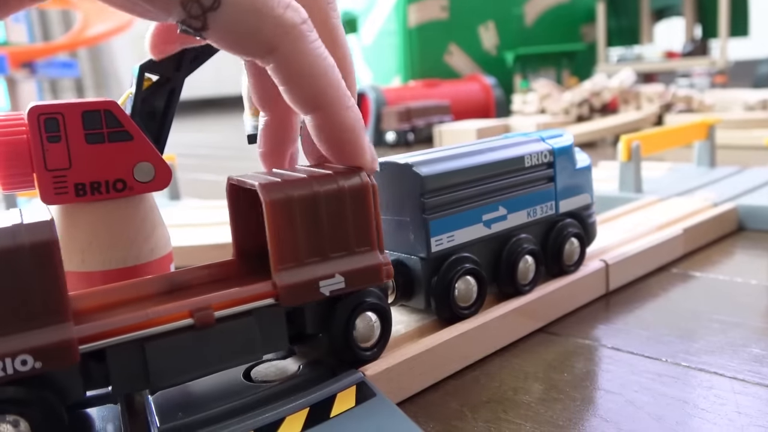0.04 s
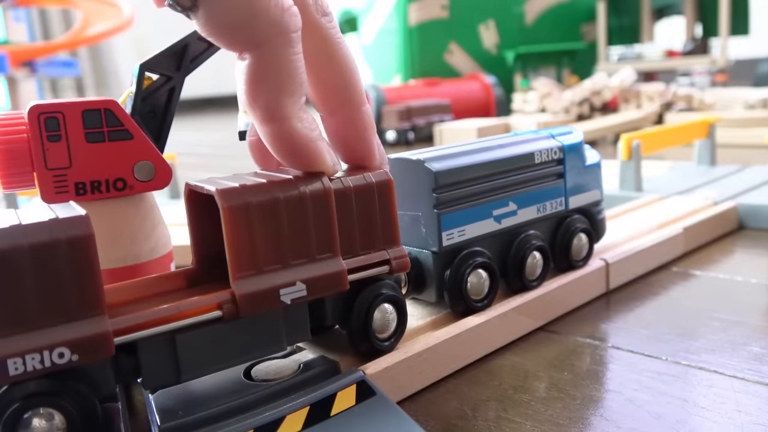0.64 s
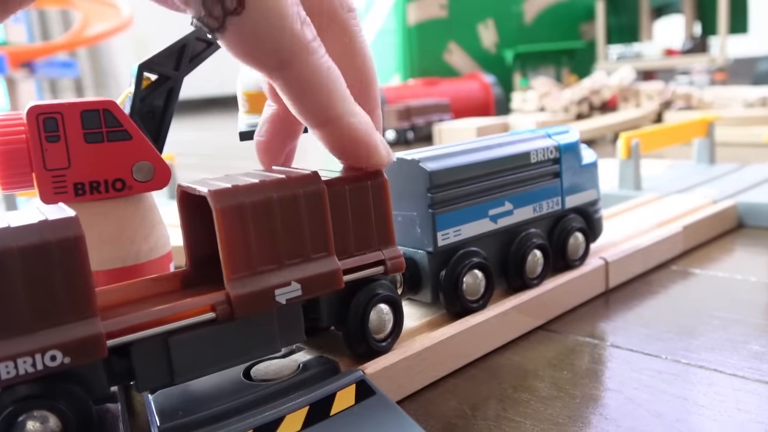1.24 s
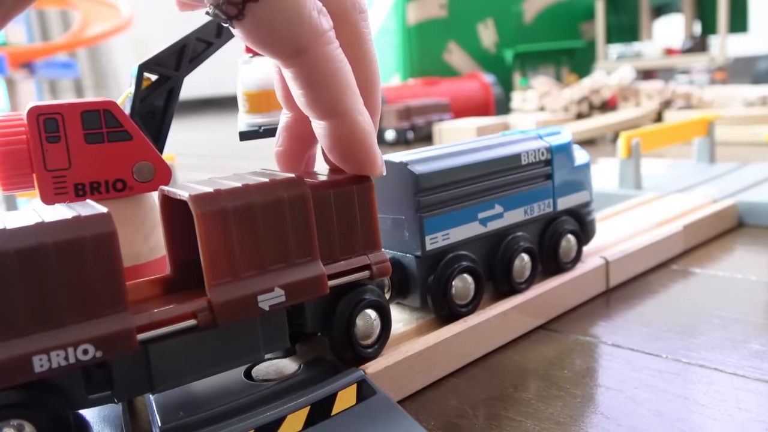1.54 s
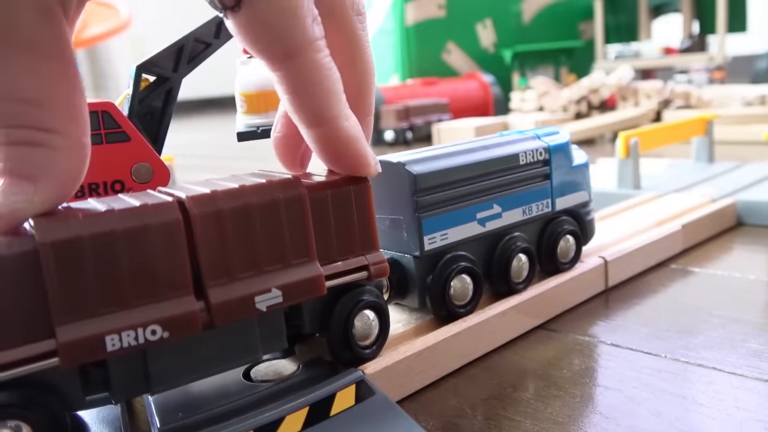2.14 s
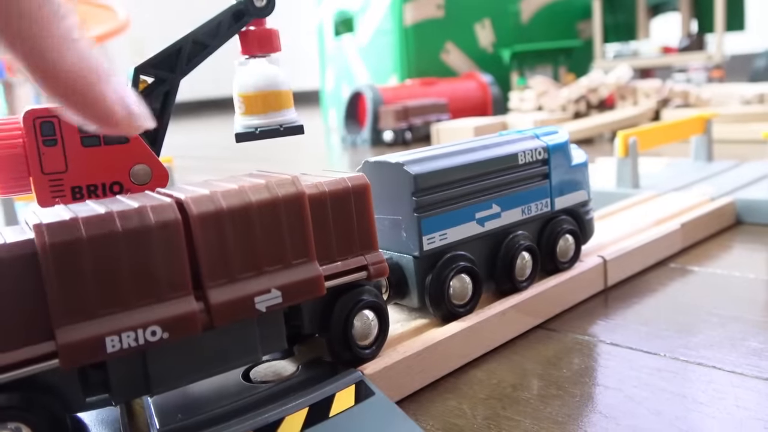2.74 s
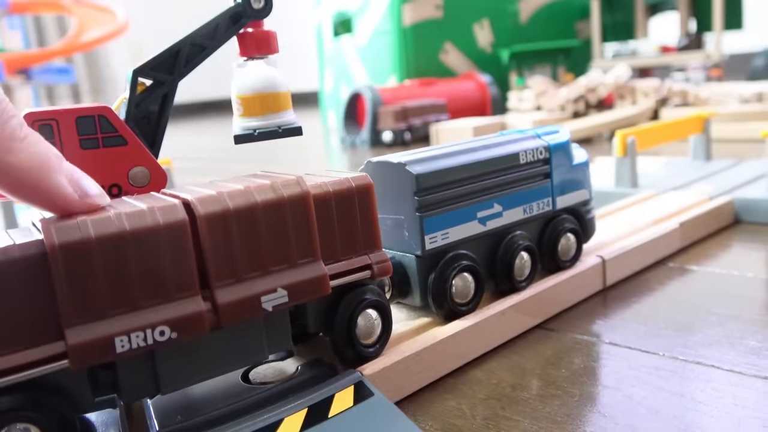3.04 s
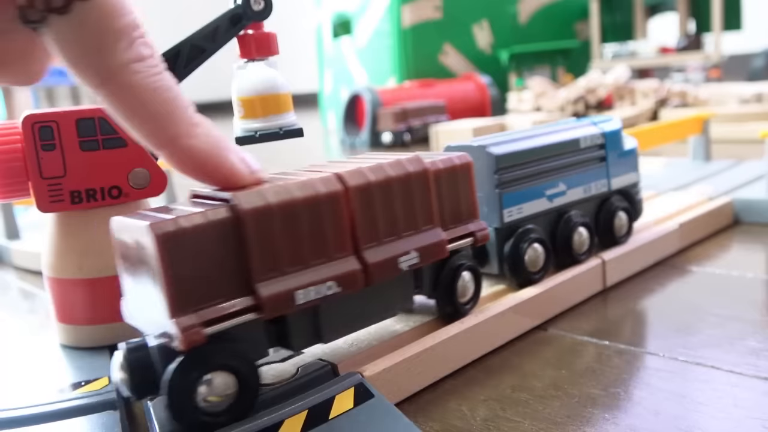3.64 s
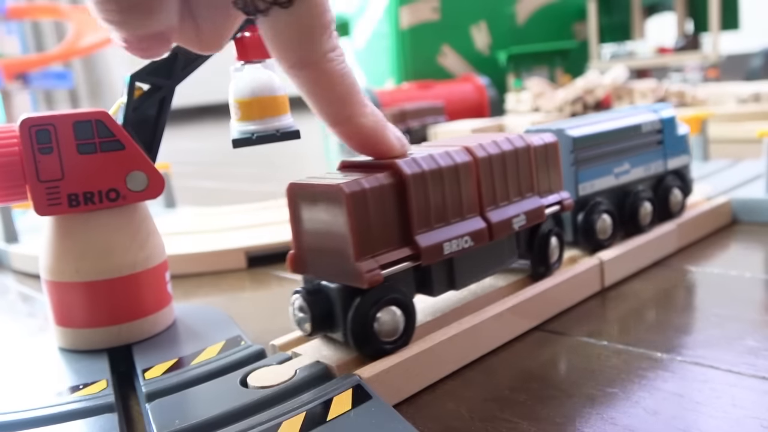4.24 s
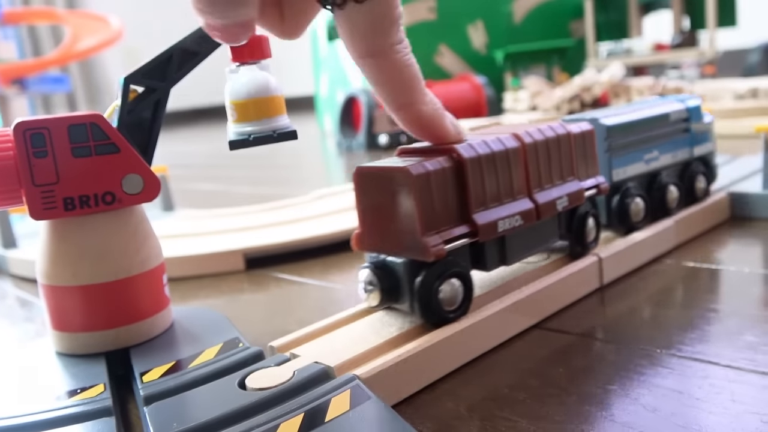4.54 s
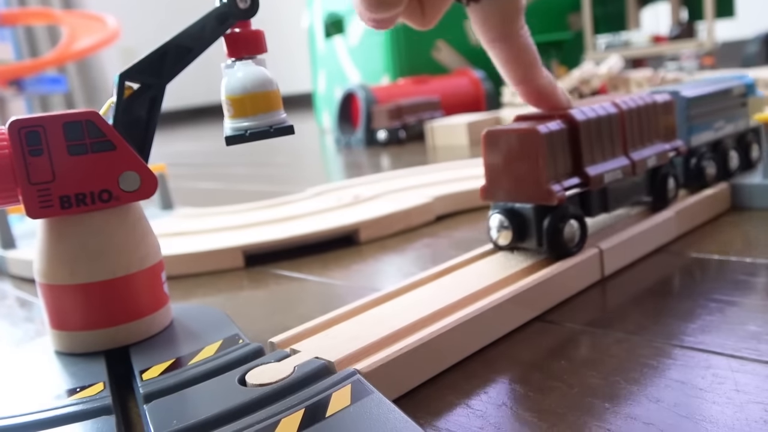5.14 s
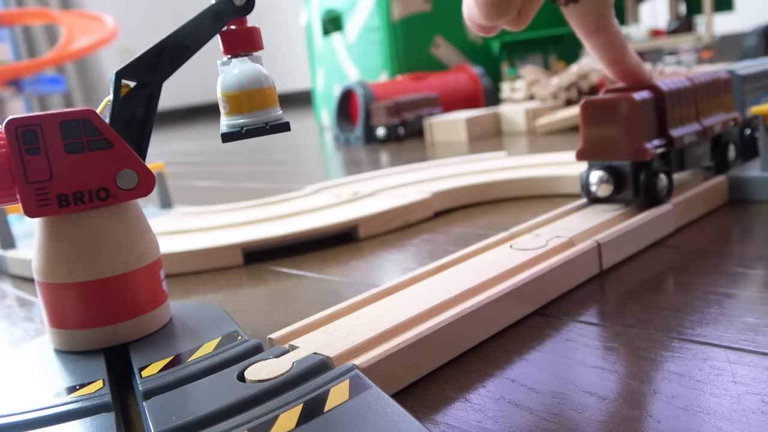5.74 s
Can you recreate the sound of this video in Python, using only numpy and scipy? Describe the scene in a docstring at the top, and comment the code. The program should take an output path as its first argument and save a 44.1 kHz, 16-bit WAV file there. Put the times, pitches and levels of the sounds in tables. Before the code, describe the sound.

Fingers slide a toy wagon's plastic cover with soft scrapes, clicks and bumps until it shuts with a sharp, briefly ringing snap. After a few more clicks and a lull, the toy train drops off a ramp with a clack and rumbles along wooden track, knocking at the joints and drifting slightly right. It is heard close up in a small, hard-floored room with a faint fan.

```python
"""Toy wagon on a wooden track

Fingers slide the plastic cover of a toy wagon along its grooves until it snaps shut and the shell rings.
Then they push the train off to the right: the wagon drops off a ramp with a clack, and its wheels
rumble over the grain and knock at the rail joints. A pair of microphones stands close by,
in a small room with a hard floor and a faint fan to the left."""
import sys
import numpy as np
from scipy import signal
from scipy.fft import rfft, irfft, next_fast_len
from scipy.io import wavfile

SR = 44100
rng = np.random.default_rng(int(sys.argv[2]) if len(sys.argv) > 2 else 0)


def dump(signal):
    """Clip the signal to [-1, 1] and save it as 16-bit WAV at the path in sys.argv[1]."""
    limited = np.clip(np.atleast_2d(signal).T, -1, 1)
    pcm = np.round(limited * 32767).astype(np.int16)
    wavfile.write(sys.argv[1], SR, pcm)


N = 264159
TIME = np.arange(N) / SR

# wheels drop off the ramp, then hit joints and dents in the rails:
# (time [s], level [dB], weight [dB], hardness [dB], edge [dB], note [Hz], ring against level [dB])
WHEEL_KNOCKS = [(3.5474, -25, 4, 8, -1, 1514, 8.5), (3.5496, -22, 4, 1.5, 5, 1156, -1),
                (3.5543, -29.5, -12, 11.5, 9, 2680, -9), (3.5638, -36.5, 16.5, 10, -1, 131, 8),
                (3.9245, -30.5, -21, 1.5, 5.5, 1390, -14), (3.956, -38.5, -1, 2, -3, 1160, 5),
                (3.98, -47.5, 12.5, -6, -10, 272, 6), (4.005, -42, 7.5, -1.5, -6, 1210, 3),
                (4.052, -42, -5, 8, -37, 2130, 6.5), (4.0856, -29, 1.5, -10, -12, 1230, -10),
                (4.552, -38.5, -2, -7, -14, 724, 0), (4.562, -41, 11, -8, -8, 269, 7),
                (4.589, -37.5, 3, -8, 13, 600, 5), (4.656, -44, 14.5, 0, -8, 264, 11),
                (4.687, -38, -6, -5, -4, 1300, -1), (4.736, -47, 17, -12, -4, 250, 0),
                (4.763, -41.5, -1, 11, 0, 1560, 15.5), (4.7642, -42, 11.5, 18.5, -14, 2170, 6),
                (4.8168, -31.5, -1.5, 5, -5, 470, 5.5), (4.8466, -36, 8, 0, -6, 1790, 3),
                (4.937, -36.5, 8, -12, -7, 264, 10), (4.98, -38.5, -4, -14, -8, 1050, 3),
                (5.056, -39, -3, 3.5, -11, 571, 0), (5.115, -37.5, -3, -6, -1, 800, -3),
                (5.2526, -37, -12, -6, -6, 984, 0), (5.296, -42, 8, -7, -4, 242, 15.5),
                (5.341, -33, 0, -4, -11, 459, 4.5), (5.4295, -37, -28, -19, -4, 1030, -10),
                (5.447, -36.5, -1, -5, -23, 1990, 0), (5.523, -41, 4, 3.5, -10, 2800, -7),
                (5.6111, -29.5, 1, 2.5, 8.5, 488, 9), (5.633, -30.5, 1.5, -2, 2, 431, 7),
                (5.6613, -37, 0, -1, -2, 996, 1), (5.668, -36, 7.5, 1, 5.5, 381, 7.5),
                (5.906, -38.5, -12, -4, -11, 1130, -5), (5.9246, -35, -14, 1, -1, 960, -4),
                (5.945, -31, -0.5, 4, 4, 890, -15), (5.956, -33, 2.5, -0.5, 7, 1080, -10),
                (5.964, -36, 6, 1, -2, 1010, -8)]
def wheel_knocks():
    """A wheel strikes the rail, leaves a note ringing and thuds through the floor."""
    out = np.zeros(N)
    for s, db, weight_db, hardness_db, edge_db, note_hz, ring_db in WHEEL_KNOCKS:
        add(out, s, blow(db, weight_db, hardness_db, note_hz, edge_db))
        add(out, s, ringing(note_hz, db + ring_db, t60_at_500_hz=0.087))
        add(out, s, floor_thud(db + weight_db - 13))
    return out


# the train rolling past the microphones: (time [s], rumble [dB], grit [dB])
ROLL = [(3.279, -65, -78), (3.42, -44.5, -60), (3.48, -33, -51), (3.62, -36, -48), (3.76, -39, -51),
        (3.94, -40.5, -48.5), (4.02, -33, -50.5), (4.2, -34, -48), (4.48, -40.5, -55), (4.53, -36.5, -49.5),
        (4.57, -32, -44), (4.68, -30.5, -44), (4.85, -33.5, -44), (5.0, -36, -47), (5.15, -41, -48.5),
        (5.3, -35, -46.5), (5.49, -41, -45.5), (5.6, -36.5, -46), (5.8, -41, -51), (5.99, -37, -45)]
# the note of the rail shifts as the wagon travels: (time [s], note [Hz])
RAIL_NOTE = [(3.5, 243), (3.8, 265), (4.0, 291), (4.25, 262), (4.45, 261.4), (4.7, 260), (4.95, 267.6),
             (5.3, 228.6), (5.6, 238.6), (5.95, 258)]
# its partials: (multiple of the note, width [Hz], level against the rumble [dB])
RAIL_PARTIALS = [(1, 62, -3.5), (1.92, 131, -12.5)]
# wheels on wood grain: (frequency [Hz], spectrum level [dB])
GRIT_SPECTRUM = [(250, -26), (480, 10.5), (720, 11.5), (880, 7), (1150, 8.5), (1400, 1.5), (1800, 0),
                 (2200, -4), (2800, -3), (3500, -11), (5300, -18), (6500, -14.5), (7400, -16),
                 (8500, -23.5), (10000, -19.5), (16000, -36)]
# wheel and axle resonances: (frequency [Hz], width [Hz], level against the grit [dB])
CHATTER_MODES = [(1003, 30, -14.5), (1205, 140, -18), (1710, 310, -11.5), (2194, 160, -19),
                 (2785, 390, -19.5)]
def rolling_wheels():
    """Wheels ride over bumps that shake the track and its rail, and chatter on the wood grain."""
    push = impacts(per_s=420, spread_db=2.5) * wander(hz=16, depth_db=2.5)
    note_hz = np.interp(TIME, *np.transpose(RAIL_NOTE))
    rail = sum(gain_of(db) * gliding_resonance(push, multiple * note_hz, width)
               for multiple, width, db in RAIL_PARTIALS)
    rumble = rail + gain_of(-3) * track(impacts(per_s=760, spread_db=2.5))
    grain = impacts(per_s=4000, spread_db=1.45) * wander(hz=42.48, depth_db=1.6)
    chatter = sum(gain_of(db) * resonate(grain, hz, width) * wander(hz=14, depth_db=5)
                  for hz, width, db in CHATTER_MODES)
    grit = gain_of(-0.5) * coloured(grain, GRIT_SPECTRUM) + chatter
    return rumble * envelope(ROLL) + grit * envelope(ROLL, column=2)


# the wooden track lying on the floor: (frequency [Hz], width [Hz], relative level [dB])
TRACK_MODES = [(85, 30.3, -40), (127, 29.6, -20.5), (159.6, 15, -15.5), (202, 9.8, 2), (256, 24, 2.5),
               (286, 26, -1), (317, 40, -23), (509, 160, 0)]
def track(push):
    """The track answers a push with its low resonances; their shares shift as the load moves along."""
    rings = sum(gain_of(db) * resonate(push, hz, width) * wander(hz=6.1, depth_db=2)
                for hz, width, db in TRACK_MODES)
    return unit_rms(band(rings, 103, 558, order=3))


# the thin shell's crowded modes: (frequency [Hz], width [Hz], relative level [dB], t60 [s])
SHELL_BANDS = [(775, 410, -7.5, 0.38), (1295, 480, -12.5, 0.76), (2495, 330, -0.5, 0.29),
               (3150, 640, 3, 0.45), (4970, 2400, -7, 0.4), (8650, 2400, -3.5, 0.25)]
# its clear notes: (frequency [Hz], relative level [dB], t60 [s])
SHELL_NOTES = [(2320, -19, .45), (2710, -15, 0.76), (2920, -16, .5), (3170, -12, .6), (3233, -12, .6),
               (3340, -15, .6), (3320, -15, .6), (3530, -16, .6), (3950, -19.5, 0.63), (4760, -22.5, .5)]
# plastic rubbing on plastic: (frequency [Hz], spectrum level [dB])
SCRAPE_SPECTRUM = [(1180, -15), (2000, -15.5), (2490, -4), (2880, -2.5), (3490, -6.5), (4530, -10),
                   (4900, -6.5), (6310, -15), (7910, -9), (13400, -24), (16000, -25)]
SNAP_S = 1.5153
def cover_snap(shell_db=-31, rush_db=-16, swell_s=0.0041, lead_s=0.0028, stop_s=0.0016):
    """The cover rushes over its catch and snaps shut; its shell buzzes and rings away."""
    after = TIME - SNAP_S
    fall_db = -60 * np.maximum(after, 0)
    clatter = impacts(per_s=2800, spread_db=-1) * wander(hz=71, depth_db=2)
    buzz = sum(gain_of(db + fall_db / t60) * resonate(resonate(clatter, hz, width), hz, width)
               for hz, width, db, t60 in SHELL_BANDS)
    notes = sum(gain_of(db + fall_db / t60) * np.sin(2 * np.pi * (hz * after + rng.random()))
                for hz, db, t60 in SHELL_NOTES)
    slip = after + lead_s  # the scrape peaks just ahead of the snap
    swell = np.exp(-np.maximum(-slip / swell_s, slip / stop_s))
    rush = coloured(rng.standard_normal(N), SCRAPE_SPECTRUM) * swell
    return gain_of(shell_db) * (buzz + notes) * (after > 0) + gain_of(rush_db) * rush


# plastic parts catching, heard close up: (time [s], level [dB], hardness [dB], note [Hz])
CLICKS = [(0.035, -41, 3.5, 3000), (0.049, -51, 8, 5000), (0.1426, -40.5, 6, 4070), (0.429, -37, 3.5, 2640),
          (0.5869, -44.5, 6, 4130), (0.7193, -49.5, -19, 2450), (0.837, -61, 3.5, 4900),
          (1.0415, -54, -5, 5000), (1.4505, -33, 7, 4830), (1.5085, -28.5, -3, 760),
          (1.5155, -20, 2.5, 2480), (1.532, -49, -4, 5000), (1.589, -37, -4, 4700),
          (1.7998, -41.5, 3.5, 2600), (1.948, -48, -9, 3670), (2.073, -41, -9.5, 905),
          (2.164, -34, -4.5, 2290), (3.02, -65, 6, 4000), (3.504, -63.5, 14, 4870),
          (3.7833, -56, 6.5, 8470), (3.863, -50.5, -1, 7560), (4.389, -43.5, -14, 2370)]
WAGON_HZ = 283.7  # the low note that clicks and blows wake in the wagon
def plastic_clicks(cover_hz=3120):
    """Plastic parts catch and click; each click leaves the cover ringing faintly."""
    shape_db = np.array([-12, -6, -3, -6, -9])  # thump, knock, clack, click, edge
    hardening = np.array([-0.51, -0.33, -0.18, 0.77, 0.97])
    out = np.zeros(N)
    for s, db, hardness_db, note_hz in CLICKS:
        add(out, s, knock(db + shape_db + hardness_db * hardening, (WAGON_HZ, note_hz)))
        add(out, s, ringing(cover_hz * rng.uniform(1, 1.03), db - 23, t60_at_500_hz=0.5))
    return out


# fingers land on the wagon:
# (time [s], level [dB], weight [dB], hardness [dB], note [Hz], ring against level [dB])
FINGER_BUMPS = [(0.048, -40, 1, -2, 1000, -8), (0.165, -40.5, -19, -18, 1400, -6),
                (0.216, -44.5, 5, -2, 1300, -6), (0.552, -33.5, 6.5, -8, 301, 3),
                (0.672, -45.5, 1.5, -9, 1100, -14), (0.85, -50, 11.5, -3, 258, -5),
                (0.9664, -43, -7, -7.5, 1074, -9), (1.0091, -45.5, 7.5, 5, 300, -1),
                (1.047, -36.5, 0.5, 4.5, 720, -6), (1.328, -43.5, 5, -7, 280, 3.5),
                (1.363, -48, -7, -1, 1200, -4), (1.3796, -48, 8.5, 3, 200, 6),
                (1.598, -35.5, 8.5, 4.5, 302, -5.5), (1.845, -41.5, 0, 4, 267, -3.5),
                (2.136, -49, -0.5, -1, 1000, -17), (3.018, -36, -2, -10, 1050, -2)]
def finger_bumps(rise_s=0.00096):
    """A soft fingertip eases into its blow and leaves the wagon ringing."""
    out = np.zeros(N)
    for s, db, weight_db, hardness_db, note_hz, ring_db in FINGER_BUMPS:
        hit = blow(db, weight_db, hardness_db, note_hz)
        add(out, s, hit * (1 - np.exp(-TIME[:len(hit)] / rise_s)))
        add(out, s, ringing(note_hz, db + ring_db, t60_at_500_hz=0.16))
    return out


def blow(db, weight_db, hardness_db, note_hz, edge_db=0):
    """A blow through the wheels into the wood: weight deepens, hardness brightens, an edge adds snap."""
    shape_db = np.array([-1.5, 0, -10, -19, -26])  # thump, knock, clack, click, edge
    hardening = np.array([0.0046, 0, 1.17, 1.27, 1.35])
    levels_db = db + shape_db + hardness_db * hardening
    levels_db[0] += weight_db
    levels_db[-2:] += edge_db * np.array([0.49, 1])
    return knock(levels_db, (WAGON_HZ, note_hz), favour_db=9.5, favour_width=0.19)


# the five registers of a contact, from thump through knock, clack and click to edge:
# (low limit [Hz], high limit [Hz], crack t60 [s], crack against modes [dB])
REGISTERS = [(140.3, 420, 0.031, -14.5), (395, 1780, 0.046, -1.5), (1840, 3600, 0.022, 5),
             (3730, 5940, 0.018, 2), (6640, 12000, 0.014, 1.5)]
# wagon and track ringing together: (frequency [Hz], relative level [dB], t60 [s])
BODY_MODES = [(123, -9, 0.05), (155, -1.5, 0.038), (201, 5, 0.031), (258, -2.5, 0.043), (322, 0.5, 0.04),
              (436.6, -5, 0.078), (476.6, -3, 0.078), (543.3, 7, 0.056), (690, -7.5, 0.067),
              (1035, -1, 0.036), (1161, 1.5, 0.033), (1434, 2.5, 0.025), (1633, -1.5, 0.0092),
              (1794, -1, 0.018), (2220, 12, 0.017), (2340, 0, 0.037), (2754, 5, 0.013), (2904, -0.5, 0.041),
              (3235, -0.5, 0.027), (4040, 14.5, 0.0064), (4700, 3.5, 0.026), (5360, -20.5, 0.0049),
              (7430, 1, 0.011), (8280, -5.5, 0.016), (10600, -12, .012)]
def knock(levels_db, notes_hz, favour_db=6, favour_width=0.12, detune=0.036):
    """One contact: a short crack and the body's modes, weighted and detuned by where it lands."""
    t = np.arange(2560) / SR
    bins = np.fft.rfftfreq(len(t), 1 / SR)
    # the force runs smoothly through the registers and favours the given notes
    centres = [np.sqrt(low * high) for low, high, *_ in REGISTERS]
    nearness = sum(np.exp(-(np.log((bins + 1) / note) / favour_width) ** 2) for note in notes_hz)
    force = gain_of(at_hz(np.transpose([centres, levels_db]), bins) + favour_db * nearness)
    hz, mode_db, t60 = np.transpose(BODY_MODES)
    landing = rng.uniform(0.71, 1, len(hz)) * rng.choice([-1, 1], len(hz))
    weights = landing * gain_of(mode_db) * np.interp(hz, bins, force)
    hz = hz * (1 + detune * rng.uniform(-1.14, 1, len(hz)))
    modes = weights[:, None] * gain_of(-60 * t / t60[:, None]) * np.sin(2 * np.pi * hz[:, None] * t)
    noise = rfft(rng.standard_normal(len(t))) * force
    out = np.zeros(len(t))
    for (low, high, crack_t60, crack_db), db in zip(REGISTERS, levels_db):
        ring = modes[(low <= hz) & (hz < high)].sum(0)
        crack = irfft(noise * ((low <= bins) & (bins < 1.35 * high)), len(t))
        crack *= gain_of(-60 * t / crack_t60)
        part = band(unit_rms(ring) + gain_of(crack_db) * unit_rms(crack), low, high)
        out += gain_of(db) * part / np.sqrt(np.mean(part[:SR // 100] ** 2))  # level of the first 10 ms
    return out


def ringing(hz, db, t60_at_500_hz):
    """The note of a struck part swells within a cycle or so and dies away, sooner if it is high."""
    t = np.arange(SR // 3) / SR
    t60 = t60_at_500_hz * np.sqrt(500 / hz)
    swell = 1 - np.exp(-t * hz)
    return gain_of(db - 60 * t / t60) * swell * np.sin(2 * np.pi * (hz * t + rng.random()))


# fingers press and drag on the wagon: (time [s], level [dB])
HANDLING = [(0.0, -42), (0.14, -40), (0.35, -48.5), (1.36, -63.5), (1.58, -57.5), (2.0, -67.5),
            (2.35, -60.5)]
def jostling(jolt_db=-30, rock_db=-20):
    """The wagon shakes on its loose axles as it is handled, jolted by the snap and rocked by bumps."""
    shake = gain_of(-3) * track(impacts(per_s=320, spread_db=3))
    ticks = coloured(impacts(per_s=180, spread_db=1), GRIT_SPECTRUM)
    axle_play = gain_of(-10) * unit_rms(band(ticks, 430, 1600))
    rocking = sum(settling(s, db + weight_db + rock_db) for s, db, weight_db, *_ in FINGER_BUMPS)
    return (shake + axle_play) * (envelope(HANDLING) + settling(SNAP_S, jolt_db)) + shake * rocking


def settling(s, db, db_per_s=112.5):
    """The wagon shakes from time s on, less and less."""
    return (TIME > s) * gain_of(db - db_per_s * abs(TIME - s))


# the cover slides and fingers brush its ribs: (start [s], length [s], rub [dB], whistle [dB])
STROKES = [(-.03, 0.18, -53, -60), (0.135, 0.15, -60.5, -60), (0.217, 0.16, -54.5, -70),
           (0.416, 0.09, -53, -62), (0.588, 0.046, -55.5, -64), (0.992, 0.066, -59.5, -74),
           (1.195, 0.14, -69.5, -63), (1.726, 0.073, -50.5, -74), (1.793, 0.23, -54.5, -81),
           (3.32, 0.35, -64, -75)]
# the whistle of the grooves: (frequency [Hz], width [Hz], relative level [dB])
GROOVE_MODES = [(2950, 250, 0), (5040, 260, -6.5), (9190, 520, 0.5)]
def cover_slides():
    """The cover rubs and whistles along its grooves, swelling and fading with each stroke."""
    friction = impacts(per_s=3500, spread_db=1.5) * wander(hz=58.4, depth_db=3.5)
    rub = coloured(friction, SCRAPE_SPECTRUM)
    whistle = unit_rms(sum(gain_of(db) * resonate(rng.standard_normal(N), hz, width)
                           for hz, width, db in GROOVE_MODES))
    out = np.zeros(N)
    for s, length, rub_db, whistle_db in STROKES:
        arch = np.sin(np.pi * np.clip((TIME - s) / length, 0, 1))
        out += (gain_of(rub_db) * rub + gain_of(whistle_db) * whistle) * arch
    return out


def rattle(count=34):
    """Loose axles and couplings tap at random while the train rolls, harder where the wheels run rough."""
    s, _, grit_db = np.transpose(ROLL)
    shape_db = np.array([0, 0, -8, -19, -28])  # thump, knock, clack, click, edge
    times = s[0] + (np.arange(count) + rng.random(count)) / count * (s[-1] - s[0])
    notes_hz = rng.choice([hz for hz, *_ in BODY_MODES], (count, 3))
    scatter_db = 3 * rng.uniform(-3.9, 1, (count, len(REGISTERS)))
    out = np.zeros(N)
    for at, notes, chance_db in zip(times, notes_hz, scatter_db):
        add(out, at, knock(np.interp(at, s, grit_db) + shape_db + chance_db, notes))
    return out


def floor_thud(db, modes_hz=(112, 130), t60s=(0.076, 0.2)):
    """The floorboards give under a wheel."""
    t = np.arange(SR // 4) / SR
    boards = sum(gain_of(-60 * t / t60) * np.sin(2 * np.pi * hz * t) for hz, t60 in zip(modes_hz, t60s))
    return gain_of(db) * band(boards, 82, 190, order=3)


def floor_boom(from_s=5.16, rise_s=0.59, against_rumble_db=-10):
    """The boards under the far stretch of track pick up the rolling."""
    reach = np.clip((TIME - from_s) / rise_s, 0, 1)
    boards = unit_rms(band(impacts(per_s=1100, spread_db=5), 68, 135, order=4))
    return gain_of(against_rumble_db) * reach * envelope(ROLL) * boards


# faint axle squeaks: (start [s], length [s], frequency [Hz], level [dB])
SQUEAKS = [(4.093, 0.013, 7200, -58), (5, 0.02, 6300, -60), (5.286, 0.019, 6160, -57),
           (5.3, 0.11, 7360, -68)]
def axle_squeaks(width_hz=310):
    """A dry axle sings briefly."""
    out = np.zeros(N)
    for s, length, hz, db in SQUEAKS:
        rub = rng.standard_normal(SR // 4)
        tone = resonate(resonate(rub, hz, width_hz), hz, width_hz)[:round(length * SR)]
        add(out, s, gain_of(db) * unit_rms(tone) * np.hanning(len(tone)))
    return out


# the small, hard-floored room: (frequency [Hz], t60 [s])
ROOM_DECAY = [(100, 1), (250, 0.39), (600, 0.54), (1500, 0.56), (3200, 0.45), (8000, 0.5), (15000, 0.18)]
# its tail, close to the toy: (frequency [Hz], tail against direct sound [dB])
ROOM_SEND = [(100, -10), (250, -0.5), (500, -7.5), (1200, -11.5), (3000, -8.5), (4500, -9), (8000, -14),
             (15000, -13)]
# the tail at the two microphones: (frequency [Hz], left-right likeness [0 to 1])
ROOM_LIKENESS = [(100, 1), (250, 0.96), (700, 0.93), (1300, 0.88), (3000, 1), (8000, 0.78), (15000, 0.313)]
def room(x, first_s=0.005):
    """A dense tail that dies by band; two close microphones hear much the same, except in the treble."""
    onset = np.clip(TIME[:SR] / first_s - 1, 0, 1)
    hz, s, (shared, apart) = signal.stft(rng.standard_normal((2, SR)) * onset, SR, nperseg=256)
    likeness = np.clip(at_hz(ROOM_LIKENESS, hz), 0, 1)[:, None]
    t60 = at_hz(ROOM_DECAY, hz)[:, None]
    tail = np.sqrt((1 + likeness) / 2) * shared + np.sqrt((1 - likeness) / 2) * np.array([apart, -apart])
    tail *= gain_of(at_hz(ROOM_SEND, hz)[:, None] - 60 * s / t60)
    tail *= np.sqrt(2 * np.log(1000) / (t60 * SR))  # a longer decay adds no energy
    return signal.fftconvolve(x[None], signal.istft(tail, SR, nperseg=256)[1], axes=1)[:, :N]


def shifting_reflections(x, count=3, shift_s=0.28):
    """As hand and train move, one pattern of reflections gives way to the next."""
    gaps = [np.minimum(abs((TIME / shift_s - k + 1) % count - 1), 1) for k in range(count)]
    return sum(room(x * np.cos(np.pi / 2 * gap)) for gap in gaps)


# room tone with the fan: (frequency [Hz], spectrum level [dB])
AIR_SPECTRUM = [(25, -17.5), (90, -10.5), (200, -8), (450, -13), (600, -6), (680, 1.5), (780, -12.5),
                (950, -13), (1130, -8.5), (1450, -14.5), (1750, -28), (3500, -31), (8000, -32.5),
                (16000, -37.5)]
# its lean between the microphones: (frequency [Hz], left against right [dB])
AIR_BALANCE = [(60, 0.5), (200, -1.5), (400, 3.5), (700, 5), (1300, -5), (4000, 0), (15000, 0)]
# its width: (frequency [Hz], side against shared air [dB])
AIR_SIDE = [(60, -11), (200, -18.5), (700, -14), (1300, -14.5), (4000, -5.5), (15000, -4.5)]
def fan_and_air(db=-53.5):
    """Steady room air with the hollow note of a fan to the left."""
    hz = np.fft.rfftfreq(N, 1 / SR)
    shared, apart = (rfft(coloured(noise, AIR_SPECTRUM)) for noise in rng.standard_normal((2, N)))
    lean_db = at_hz(AIR_BALANCE, hz) / 2
    side = gain_of(at_hz(AIR_SIDE, hz)) * np.array([apart, -apart])
    return gain_of(db) * irfft(shared * gain_of([lean_db, -lean_db]) + side, N)


def impacts(per_s, spread_db):
    """Tiny impacts of uneven size at random times, at rms 1."""
    size = gain_of(spread_db * np.minimum(rng.exponential(1, N), 4))
    return unit_rms(size * rng.choice([-1, 1], N) * (rng.random(N) < per_s / SR))


def wander(hz, depth_db):
    """A gain that wanders at random up to a given rate."""
    steps = rng.standard_normal(1000)
    drift = unit_rms(np.interp(2 * hz * TIME, np.arange(len(steps)), steps))
    return unit_rms(gain_of(depth_db * drift))


def resonate(x, hz, width):
    """One resonance, at rms 1."""
    return unit_rms(signal.lfilter(*signal.iirpeak(hz, hz / width, SR), x))


def gliding_resonance(x, hz, width):
    """A steep resonance that follows the curve hz, at rms 1."""
    turn = np.exp(2j * np.pi * np.cumsum(hz) / SR)
    pole = np.exp(-np.pi * width / SR)
    return unit_rms((turn * signal.lfilter([1], [1, -2 * pole, pole * pole], x / turn)).real)


def coloured(x, spectrum):
    """Shapes x by a spectrum, at rms 1."""
    size = next_fast_len(N)
    gains = gain_of(at_hz(spectrum, np.fft.rfftfreq(size, 1 / SR)))
    return unit_rms(irfft(rfft(x, size) * gains, size)[:N])


def band(x, low_hz, high_hz, order=2):
    """Causal band-pass."""
    return signal.sosfilt(signal.butter(order, [low_hz, high_hz], "band", fs=SR, output="sos"), x)


def envelope(rows, column=1, fade_s=0.02):
    """A dB column over time as a gain that fades out beyond its ends."""
    rows = np.asarray(rows)
    s = rows[:, 0]
    inside = np.interp(TIME, [s[0] - fade_s, s[0], s[-1], s[-1] + fade_s], [0, 1, 1, 0])
    return inside * gain_of(np.interp(TIME, s, rows[:, column]))


def at_hz(points, hz):
    """Reads a table on a log-frequency axis."""
    points_hz, values = np.transpose(points)
    return np.interp(np.log(hz + 1), np.log(points_hz + 1), values)


def add(mix, s, sound):
    """Mixes a sound in at time s."""
    part = mix[max(round(s * SR), 0):][:len(sound)]
    part += sound[:len(part)]


def gain_of(db):
    """Decibels to amplitude."""
    return 10 ** (np.asarray(db) / 20)


def unit_rms(x):
    """Scales to rms 1."""
    return x / np.sqrt(np.mean(x ** 2) + 1e-20)


def scene(start_left_db=1.04, depart_s=3.46, drift_db_per_s=1.63):
    """The train stands a little left of the microphones, then moves off to the right through the room."""
    contacts = plastic_clicks() + finger_bumps() + wheel_knocks() + rattle() + rolling_wheels()
    train = band(contacts, 80, 22000) + cover_snap() + floor_boom()
    train += jostling() + cover_slides() + axle_squeaks()
    lean_db = (start_left_db - drift_db_per_s * np.maximum(TIME - depart_s, 0)) / 2
    return (train + shifting_reflections(train)) * gain_of([lean_db, -lean_db]) + fan_and_air()


# the unequal microphones: (frequency [Hz], left against right [dB])
MIC_BALANCE = [(60, 1), (130, 0), (200, 2.5), (290, 6), (420, 1.5), (600, -1), (850, 4.5), (1200, 4.5),
               (1700, 2), (2600, 2), (4800, 1.5), (8120, 0.8), (15000, 0)]
# the phase between them: (frequency [Hz], lead of the left [rad])
MIC_PHASE = [(0, 0.64), (4740, -0.17), (8440, -0.84), (8790, -0.87), (12000, -0.43), (12600, -0.21),
             (16100, -0.067)]
def record(dry, limit_hz=16100):
    """Two close microphones of unequal response, then the recorder's band limit."""
    hz = np.fft.rfftfreq(N, 1 / SR)
    left = gain_of(at_hz(MIC_BALANCE, hz) / 2) * np.exp(1j * at_hz(MIC_PHASE, hz) / 2)
    heard = irfft(rfft(dry) * np.array([left, 1 / left]), N)
    low_pass = signal.firwin(511, limit_hz, window=("kaiser", 9), fs=SR)
    return signal.oaconvolve(heard, low_pass[None], "same")


dry = scene()
out = record(dry)
dump(out)
```